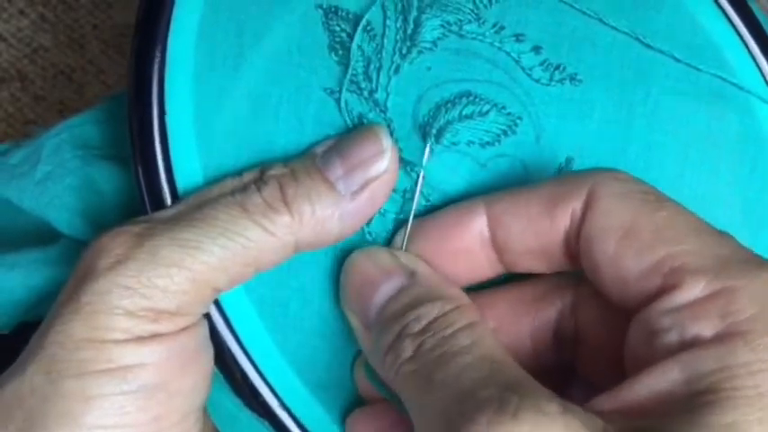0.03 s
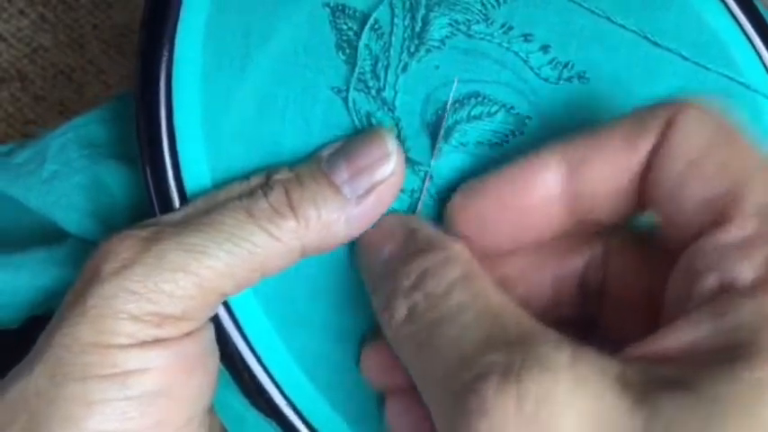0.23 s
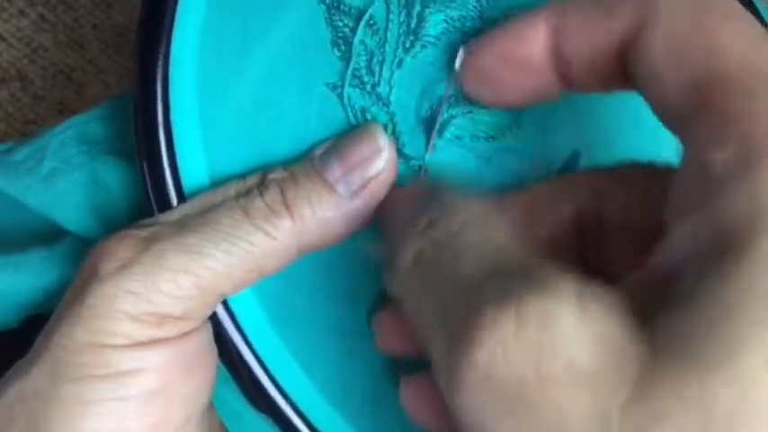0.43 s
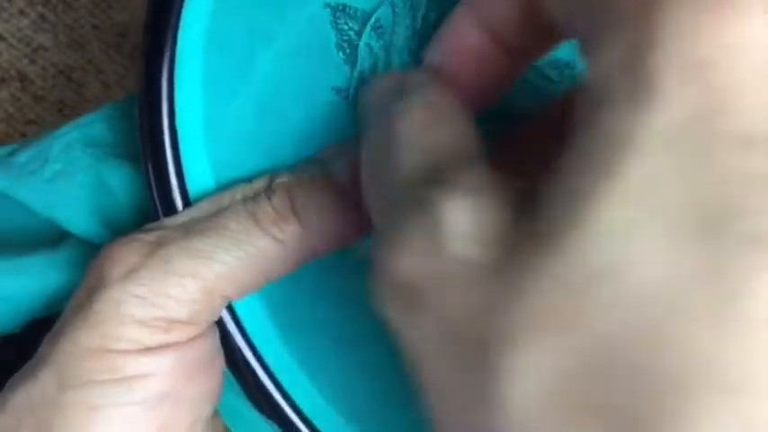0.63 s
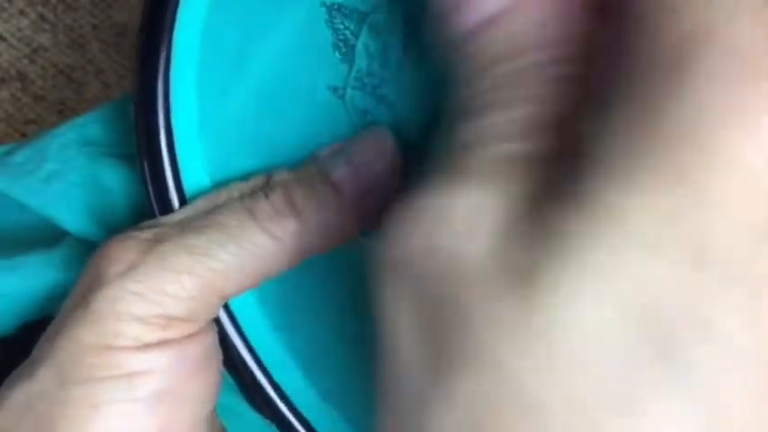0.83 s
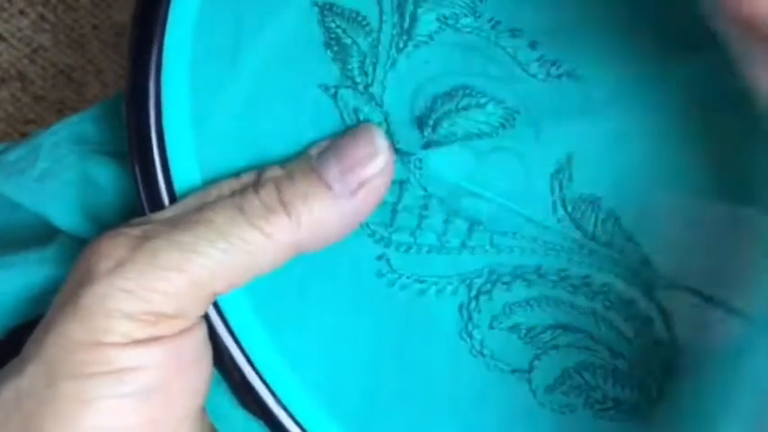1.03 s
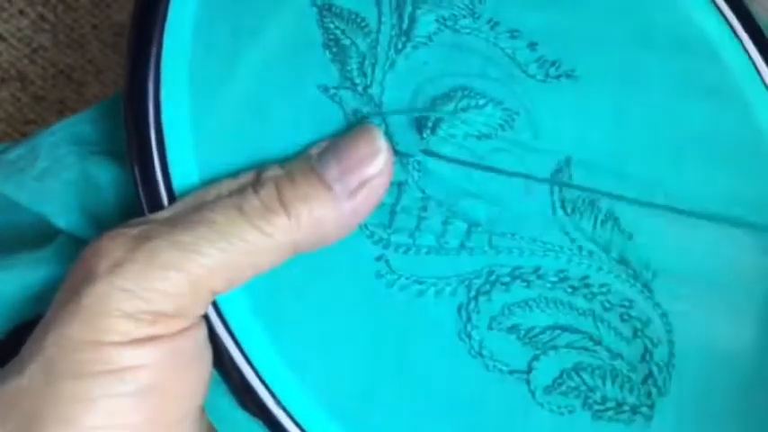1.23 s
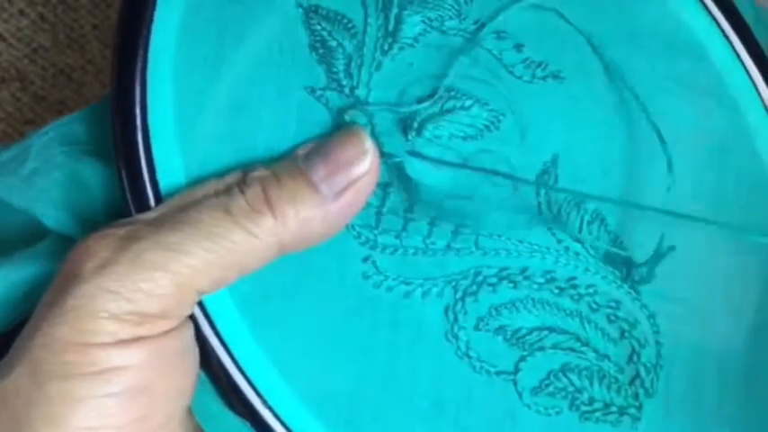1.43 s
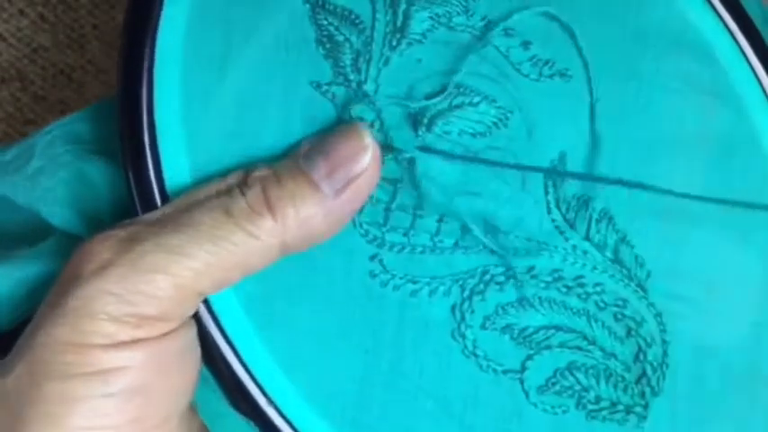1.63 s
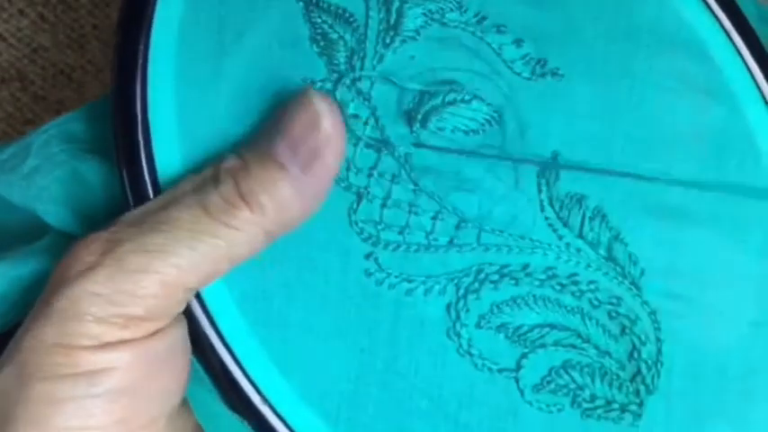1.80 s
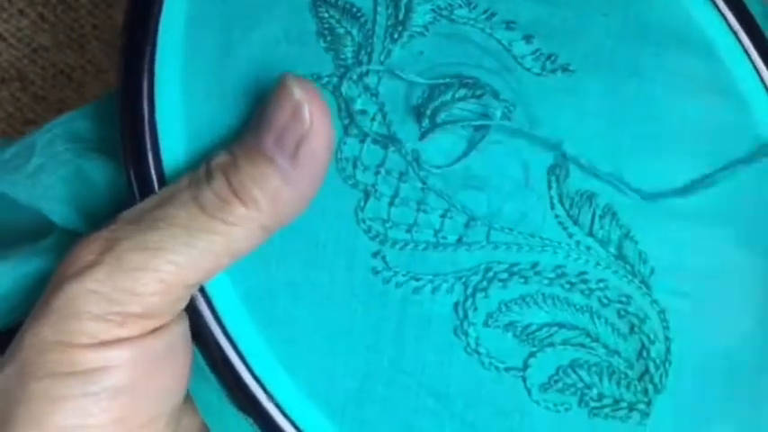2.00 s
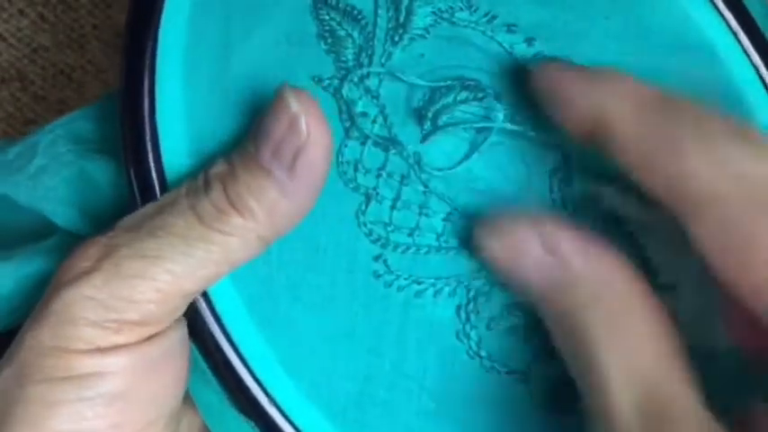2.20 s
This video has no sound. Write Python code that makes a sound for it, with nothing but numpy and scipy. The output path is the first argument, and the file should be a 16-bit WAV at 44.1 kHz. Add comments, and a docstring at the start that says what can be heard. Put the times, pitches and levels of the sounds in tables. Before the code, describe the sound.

Thread is drawn through cloth stretched in a hoop. Needle and fingers rub faintly, the needle ticks through twice, then the thread hisses and snaps tight with a dull thump, close to the microphone in a quiet room.

```python
"""One stitch of hand embroidery, close to the microphone in a quiet, small furnished room.
Needle and fingers rub over cloth stretched in a hoop, the needle ticks and pops through, and a long
thread is drawn after it with a scratchy hiss of fibres catching and slipping.
A last tug snaps the stitch tight, and the cloth thumps like a slack drum."""
import sys
import numpy as np
from scipy import signal
from scipy.fft import rfft, irfft, next_fast_len
from scipy.io import wavfile
from scipy.ndimage import uniform_filter1d

SR = 44100
rng = np.random.default_rng(int(sys.argv[2]) if len(sys.argv) > 2 else 0)


def waveform_to_disk(signal):
    """Save audio, clipped to [-1, 1], as 16-bit WAV at the path in sys.argv[1]."""
    frames = np.transpose(np.atleast_2d(signal))
    scaled = np.clip(frames, -1, 1) * 32767
    samples = np.round(scaled).astype(np.int16)
    wavfile.write(sys.argv[1], SR, samples)


N = 99577
TIME = np.arange(N) / SR

# low drumming of rubbed cloth (frequency [Hz], relative level [dB])
DRUMMING = [(40, -16), (65, -2), (88, 0), (105, -7), (130, 6.5), (165, -7.5), (205, -3.5), (245, -9),
            (295, -7), (420, -24.5), (1500, -91)]


def amp(db):
    """Decibels to gain."""
    return 10 ** (np.asarray(db) / 20)


def unit(x):
    """Scales to rms 1."""
    return x / np.sqrt(np.mean(x ** 2) + 1e-20)


def fader(times, db):
    """A gain curve through points in dB, silent outside them."""
    return amp(np.interp(TIME, times, db)) * (TIME > times[0]) * (TIME < times[-1])


def colour(x, spectrum, peak_hz=1000, peak_db=0, peak_octaves=0.34):
    """Filters by a spectrum with one optional broad peak; rms 1."""
    size = next_fast_len(N, True)
    octave = np.log2(np.fft.rfftfreq(size, 1 / SR) + 1)
    hz, db = np.transpose(spectrum)
    peak = peak_db * np.exp(-.5 * ((octave - np.log2(peak_hz)) / peak_octaves) ** 2)
    roll_off = 24 * np.maximum(np.log2(hz[0] + 1) - octave, 0)
    gain = amp(np.interp(octave, np.log2(hz + 1), db) + peak - roll_off)
    return unit(irfft(rfft(x, size) * gain, size)[:N])


def resonate(x, hz, width_hz):
    """A steep resonance that can follow a pitch curve; rms 1."""
    carrier = np.exp(2j * np.pi * np.cumsum(hz * np.ones(N)) / SR)
    pole = np.exp(-np.pi * width_hz / SR)
    return unit((carrier * signal.lfilter([1], np.poly([pole, pole]), x / carrier)).real)


def room_tone(level_db=-53.5):
    """The steady low hush of the room behind the work."""
    # spectrum of the hush (frequency [Hz], relative level [dB])
    hush = [(25, -38), (42, -10), (62, 3.5), (90, -10), (130, -5), (180, -11), (290, -9), (420, -17.5),
            (700, -22.5), (1400, -28), (7500, -35.5), (9500, -33.5), (13300, -36), (15800, -59)]
    return amp(level_db) * colour(rng.standard_normal(N), hush)


def room_tail(x, t60=0.27, level_db=-16.5):
    """The short tail of a small furnished room, faint at this close distance."""
    t = np.arange(SR // 2) / SR
    tail = rng.standard_normal(len(t)) * np.exp(-np.log(1000) * t / t60) * (t > .006)
    return amp(level_db) * signal.fftconvolve(x, tail / np.linalg.norm(tail))[:N]


def drift(x, depth_db=1.5, patch_hz=350, patch_s=.045):
    """The contact point moves over the weave, so small resonances come and go."""
    frames = signal.stft(x, nperseg=512)[2]
    patches = uniform_filter1d(rng.standard_normal(frames.shape), round(patch_hz * 512 / SR), axis=0)
    patches = uniform_filter1d(patches, round(patch_s * SR / 256), axis=1)
    return signal.istft(frames * amp(depth_db * unit(patches)), nperseg=512)[1][:N]


def friction(fibres_per_s=5000, spread_db=3, smooth_share=0.59, uneven_db=1.0):
    """Thousands of fibres catching and slipping under slightly uneven pressure."""
    catches = (rng.random(N) < fibres_per_s / SR) * rng.choice([-1, 1], N)
    catches = catches * amp(spread_db * np.minimum(rng.exponential(1, N), 6))
    pressure = unit(uniform_filter1d(rng.standard_normal(N), size=400))
    rub = np.sqrt(1 - smooth_share) * unit(catches) + np.sqrt(smooth_share) * rng.standard_normal(N)
    return drift(rub) * amp(uneven_db * pressure)


def strokes(rows, spectrum):
    """Each stroke speeds up and slows down, hissing and making the cloth drum."""
    out = np.zeros(N)
    for start, peak, end, db, squeak_hz, squeak_db, drum_db in rows:
        speed = np.sin(np.pi / 2 * np.interp(TIME, [start, peak, end], [0, 1, 0])) ** 2.12
        rub = friction()
        hiss = amp(db) * colour(rub, spectrum, squeak_hz, squeak_db)
        out += speed * (hiss + amp(drum_db) * colour(rub, DRUMMING))
    return out


def cloth_scrapes():
    """Needle and fingers rub over the stretched cloth."""
    # strokes (start [s], peak [s], end [s], hiss [dB], squeak [Hz], squeak boost [dB], drumming [dB])
    scrapes = [(-.06, .05, 0.19, -63.5, 1550, 10, -58.5), (.05, .172, 0.27, -45.5, 9600, 5.5, -52),
               (.21, .295, 0.43, -49, 10100, 3.5, -61), (.36, .47, 0.63, -51, 1720, 4.5, -60.5),
               (.47, .525, 0.6, -49.5, 5350, 14, -46), (.55, .64, 0.804, -55, 6000, -1, -53.5),
               (.66, .72, 0.76, -55, 1360, 7.5, -69), (.72, .77, 0.83, -56, 11900, 13, -68.5)]
    # hiss of the cloth (frequency [Hz], relative level [dB])
    spectrum = [(400, -18), (750, -5), (1300, -1.5), (2400, -3.5), (3800, -6), (4500, -2), (5500, -6),
                (6400, -2.5), (7500, -6), (9500, -3), (11700, -5), (12800, -1), (14400, -8.5),
                (15600, -6.5)]
    return strokes(scrapes, spectrum)


def needle_ticks(splinter_s=.0011):
    """Needle and thread snap past the weave: a click, a splinter of fibre noise, a ring of the hoop."""
    # snaps (time [s], level [dB], pitch [Hz], width [cycles], splinter gain [dB], ring gain [dB])
    ticks = [(0.56, -59, 7020, .5, -3, -18), (1.3587, -45, 9100, 0.46, -6.5, -29),
             (.6929, -25, 1910, 0.53, -16.5, -18), (.8897, -21.5, 1480, 0.54, -16, -14),
             (1.8041, -31, 4850, 1.75, -5.5, -5.5), (1.8187, -43, 2900, 0.43, 1, -2)]
    # modes of the hoop (frequency [Hz], relative level [dB], t60 [s])
    hoop = [(849, -3, 0.084), (1130, -23, 0.023), (1420, 5.5, 0.023), (1890, -17, 0.063), (2640, 4, 0.02),
            (3040, 5, 0.01), (4920, -6, 0.029)]
    out = np.zeros(N)
    for at, db, hz, cycles, splinter_db, ring_db in ticks:
        t = TIME - at
        after = np.maximum(t, 0)
        snap = np.exp(-.5 * (t * hz / cycles) ** 2) * np.cos(2 * np.pi * hz * t)
        splinter = amp(splinter_db) * np.exp(-abs(t) / splinter_s) * rng.standard_normal(N)
        ring = sum(amp(mode_db) * np.exp(-np.log(1000) * after / t60)
                   * np.sin(2 * np.pi * mode_hz * after) for mode_hz, mode_db, t60 in hoop)
        out += amp(db) * (snap + splinter + .5 * amp(ring_db) * ring)
    return out


def cloth_thumps():
    """The jolted cloth rings briefly as a membrane; its pitch depends on how the fingers hold it."""
    # jolts (time [s], gain [dB], lowest mode [Hz], t60 [s], rise [s], overtone tilt [dB/octave])
    jolts = [(.044, -31.5, 363, 0.033, 0.0067, -8), (.172, -40.5, 239, 0.052, 0.0037, -10),
             (0.197, -37, 165, 0.063, 0.0042, -4.5), (0.4329, -25, 170.5, 0.05, 0.0087, -25),
             (0.507, -32, 168, 0.045, 0.0038, 3.5), (0.717, -30.5, 71, 0.077, 0.0039, -17),
             (0.748, -33, 91, 0.07, 0.0053, -7), (0.878, -52, 112, 0.025, 0.0065, -17),
             (0.8899, -25, 94.7, .11, 0.00066, 5), (0.933, -29, 76, 0.13, 0.0044, -23),
             (1.092, -32, 91, 0.073, 0.0019, -16), (1.199, -35.5, 135, 0.15, 0.0021, -15),
             (1.269, -32.5, 129, 0.051, .003, -3), (1.29, -31.5, 110, 0.12, 0.0029, -19),
             (1.357, -38, 135, 0.059, 0.0036, -14), (1.574, -28, 120, 0.035, 0.004, -10),
             (1.8043, -10, 156, 0.035, 0.0012, -32), (1.8265, -23, 143.6, 0.033, 0.0008, -24),
             (1.8488, -25.5, 132.6, 0.045, 0.0029, -25), (1.807, -15, 56, .11, 0.018, -8)]
    # modes of the cloth (frequency [ratio], relative level [dB], decay time [share of t60])
    modes = [(1, 5.5, 0.91), (1.6, -0.5, 0.6), (2.1, 1, 0.41), (3.15, -9.5, 0.31), (4.6, -25, 0.43),
             (6.2, -24.5, 0.63)]
    t = np.arange(SR // 4) / SR
    out = np.zeros(N)
    for at, db, hz, t60, rise_s, tilt in jolts:
        ring = sum(amp(mode_db + tilt * np.log2(ratio)) * np.exp(-np.log(1000) * t / (t60 * share))
                   * np.sin(2 * np.pi * hz * ratio * t) for ratio, mode_db, share in modes)
        thump = amp(db) * (1 - np.exp(-(t / rise_s) ** 2)) * ring
        start = round(at * SR)
        out[start:start + len(t)] += thump[:N - start]
    return out


def thread_tugs():
    """The thread slides through the weave in short pulls."""
    # slides (start [s], peak [s], end [s], hiss [dB], squeak [Hz], squeak boost [dB], drumming [dB])
    tugs = [(1.255, 1.277, 1.294, -44, 9400, 13, -46), (1.42, 1.47, 1.5, -58, 1000, -3, -48),
            (1.43, 1.54, 1.68, -52, 13000, -4, -50.5)]
    # hiss of the slides (frequency [Hz], relative level [dB])
    spectrum = [(400, 2.5), (2300, 0.5), (3800, -8), (5100, -1), (6800, -7.5), (10000, -2), (10900, 3.5),
                (11800, 1), (12750, 9.5), (13700, -6), (15500, 4.5)]
    return strokes(tugs, spectrum)


def thread_draw():
    """The long thread runs through the weave with a broad falling zip and shakes the cloth."""
    # course of the draw (time [s], hiss [dB], drumming [dB])
    draw = [(0.801, -73, -75), (.86, -57.5, -48.5), (0.903, -52.5, -31), (.965, -45.5, -58),
            (1.03, -46, -44.5), (1.09, -44.5, -46), (1.15, -45, -41), (1.225, -47.5, -40),
            (1.279, -44.5, -36.5), (1.309, -59.5, -54), (1.36, -61, -59), (1.43, -72, -76)]
    # hiss of the running thread (frequency [Hz], relative level [dB])
    spectrum = [(350, -3.5), (600, 2.5), (900, -3.5), (1400, 4.5), (2000, -5), (2500, 1.5), (3300, -7.5),
                (4700, -4), (8800, -6), (11000, -4), (12700, -2.5), (15600, -5.5)]
    # the thread's ring falls as its free length grows (time [s], pitch [Hz], level [dB])
    falling_zip = [(.93, 7430, -74), (1.065, 6500, -54), (1.14, 5700, -58), (1.225, 4400, -54.5),
                   (1.262, 3500, -53), (1.29, 2850, -53.5), (1.33, 2680, -63), (1.37, 2500, -62.5),
                   (1.42, 2400, -80)]
    times, hiss_db, drum_db = np.transpose(draw)
    zip_s, zip_hz, zip_db = np.transpose(falling_zip)
    ring = fader(zip_s, zip_db) * resonate(friction(), np.interp(TIME, zip_s, zip_hz), width_hz=1700)
    hiss = fader(times, hiss_db) * colour(friction(), spectrum)
    return ring + hiss + fader(times, drum_db) * colour(friction(), DRUMMING)


def stitch_tightening():
    """At full length the taut thread rasps on steady resonances while the stitch closes."""
    # course of the last tug (time [s], hiss [dB], drumming [dB])
    last_tug = [(1.67, -65, -78), (1.698, -60.5, -48.5), (1.718, -46, -58), (1.737, -49, -46.5),
                (1.774, -44, -42.5), (1.817, -46.5, -39), (1.835, -53.5, -47), (1.862, -52.5, -63),
                (1.911, -69, -52)]
    # hiss of the taut thread (frequency [Hz], relative level [dB])
    spectrum = [(300, 17), (600, 4.5), (1000, 2.5), (1500, -5.5), (2300, -5.5), (4000, -11), (5000, -4),
                (6200, -15.5), (7800, -4.5), (10000, -6.5), (10900, 1.5), (12700, -1.5), (13500, -16),
                (15500, -4)]
    # its resonances (frequency [Hz], width [Hz], level against the hiss [dB])
    taut_rings = [(1434, 440, -11.5), (3110, 410, -14), (10760, 790, -13)]
    times, hiss_db, drum_db = np.transpose(last_tug)
    rings = sum(amp(db) * resonate(friction(), hz, width) for hz, width, db in taut_rings)
    rasp = fader(times, hiss_db) * (colour(friction(), spectrum) + rings)
    return rasp + fader(times, drum_db) * colour(friction(), DRUMMING)


def scene():
    """One stitch in close-up, in mono, over the room tone."""
    stitch = cloth_scrapes() + thread_draw() + stitch_tightening() + thread_tugs()
    stitch += needle_ticks() + cloth_thumps()
    return (stitch + room_tail(stitch) + room_tone())[None]


def record(dry):
    """The microphone's bass roll-off and a steep band limit."""
    low_cut_hz, band_edge_hz = 60.4, 15850
    thinned = signal.sosfilt(signal.butter(2, low_cut_hz, "highpass", fs=SR, output="sos"), dry)
    band_limit = signal.firwin(1601, band_edge_hz, window=("kaiser", 9), fs=SR)
    return signal.oaconvolve(thinned, band_limit[None], "same")


dry = scene()
out = record(dry)
waveform_to_disk(out)
```